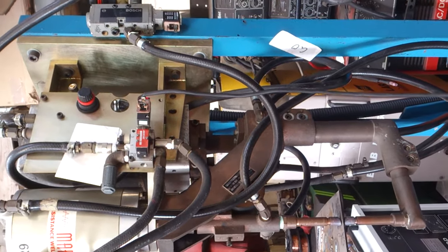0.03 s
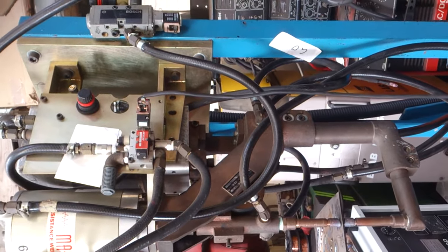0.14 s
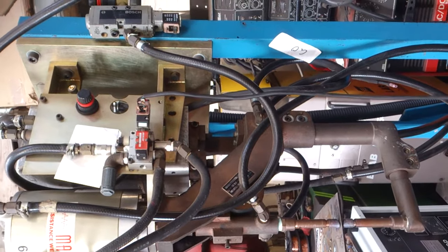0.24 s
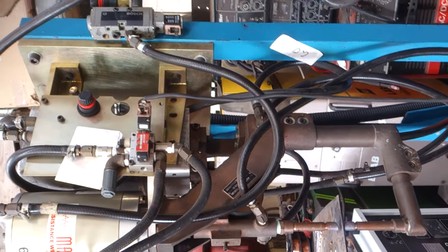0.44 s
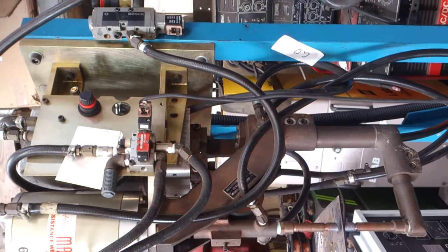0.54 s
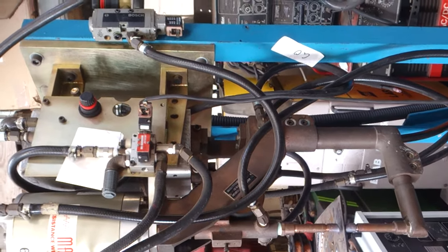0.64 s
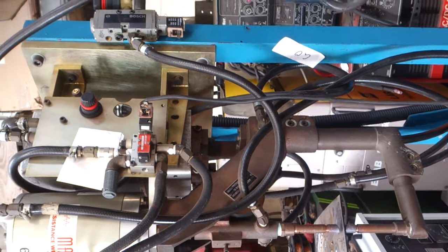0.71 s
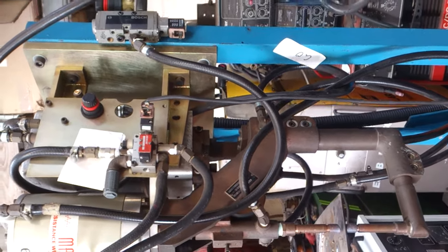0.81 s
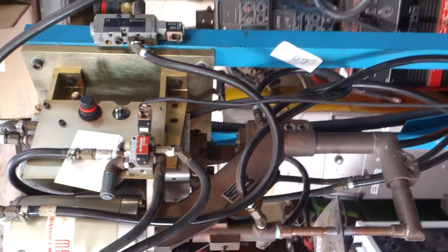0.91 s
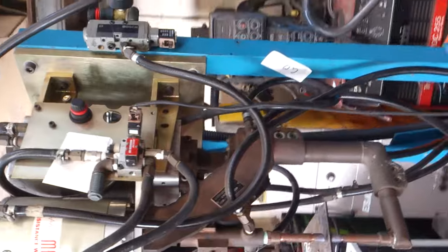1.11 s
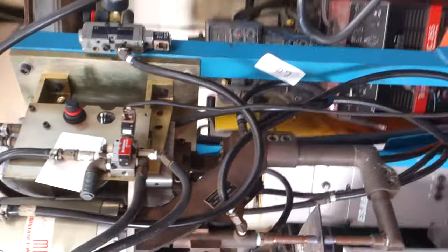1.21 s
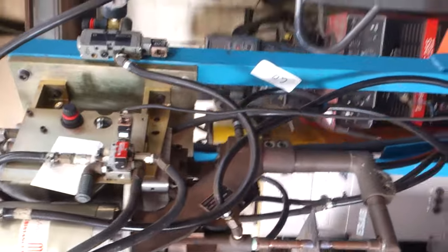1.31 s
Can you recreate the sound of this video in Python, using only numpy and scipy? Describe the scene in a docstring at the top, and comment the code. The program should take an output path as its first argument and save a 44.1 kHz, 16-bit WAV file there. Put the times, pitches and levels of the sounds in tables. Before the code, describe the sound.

A pneumatic spot welder clicks, vents a short burst of air with a falling whistle, then clacks hard on steel with a low knock; thin leak hiss continues, close microphone in a small workshop.

```python
"""Air-driven spot welder ending its cycle

A switch clicks and a valve ticks; the cylinder vents as shaped noise, a low puff and a whistle of falling pitch.
Steel hits its stop as noise cracks and ringing modes; then the arm knocks home and the frame booms, both as
sums of decaying modes. Faint creaks follow. A leak of resonant noise hisses over the workshop's low background.
"""
import sys
import numpy as np
from scipy import signal
from scipy.fft import rfft, irfft, next_fast_len
from scipy.io import wavfile
from scipy.ndimage import map_coordinates

SR = 44100
rng = np.random.default_rng(int(sys.argv[2]) if len(sys.argv) > 2 else 0)


def master(y):
    """Save y as 16-bit WAV."""
    cut = np.clip(np.atleast_2d(y).T, -1, 1)
    pcm = np.round(cut * 32767)  # scale
    wavfile.write(sys.argv[1], SR, pcm.astype(np.int16))


N = 59535
T = np.arange(N) / SR  # time of every sample, s
VENT_S, VENT_END_S, VENT_RISE_S = 0.1624, 0.444, 0.0022  # the exhaust port opens, closes; rise time


def amp(db):
    """Level: twenty decibels are a factor of ten in amplitude."""
    return 10 ** (np.asarray(db) / 20)


def unit(x):
    """Normalisation: the root-mean-square amplitude becomes 1."""
    return x / np.sqrt(np.mean(x ** 2) + 1e-20)


def along(points, hz):
    """Spectral interpolation: (frequency_hz, value) points are joined on a logarithmic axis."""
    f, v = np.transpose(points)
    return np.interp(np.log(hz + 1), np.log(f + 1), v)


def curve(rows):
    """Linear interpolation: (time_s, value) points are read at every sample."""
    return np.interp(T, *np.transpose(rows))


def wobble(rate):
    """Band-limited fluctuation: a spline through random knots, rate of them per second."""
    knots = rng.standard_normal(4096)
    return map_coordinates(knots, [T * rate], mode="wrap")


def filtered(x, response):
    """Linear filtering: the spectrum is multiplied by a function of frequency."""
    m = next_fast_len(N + 8192)
    spectrum = rfft(x, m) * response(np.fft.rfftfreq(m, 1 / SR))
    return irfft(spectrum, m)[:N]


def noise(response):
    """Coloured noise: white noise filtered, then brought to rms 1."""
    return unit(filtered(rng.standard_normal(N), response))


def rush(spectrum):
    """Turbulence noise: rms 1, coloured by (frequency_hz, level_db) points."""
    return noise(lambda hz: amp(along(spectrum, hz)))


def fade(start, rise, db_per_s):
    """Exponential decay: an exponential onset (time constant rise, s), then a steady fall in decibels."""
    age = np.maximum(T - start, 0)
    return (1 - np.exp(-age / rise)) * amp(-db_per_s * age)


def ring(modes, start, rise, waver):
    """Modal synthesis: damped sines are summed, each roughened by a wandering phase (waver, rad)."""
    total = 0
    for hz, db, t60 in modes:
        phase = 2 * np.pi * hz * (T - start) + waver * wobble(60)
        total = total + amp(db) * fade(start, rise, 60 / t60) * np.sin(phase)
    return total


def bursts(rows, rise):
    """Impact noise: short decaying bursts, each confined to its own band on an octave scale."""
    total = 0
    for start, db, hz, width, t60 in rows:
        band = noise(lambda f: 1 / (1 + (np.log2((f + 1) / hz) / width) ** 4))
        total = total + amp(db) * fade(start, rise, 60 / t60) * band
    return total


def in_room(x, wet_db):
    """Reverberation: convolution with a noise tail whose decay time depends on frequency."""
    # reverberation times of the workshop: frequency_hz, t60_s
    decay_times = [(150, 0.42), (1000, 0.63), (3000, 0.45), (7000, 0.63), (12000, 0.34)]
    # initial spectrum of the tail: frequency_hz, level_db
    tail_colour = [(150, 5.5), (400, 2), (1500, 3), (2800, 6.5), (4500, -3.5), (8000, -1), (12000, 1)]
    hz, t, z = signal.stft(rng.standard_normal(SR), SR, nperseg=256)
    tail_db = along(tail_colour, hz)[:, None] - 60 * t / along(decay_times, hz)[:, None]
    tail = signal.istft(z * amp(tail_db), SR, nperseg=256)[1]
    tail *= 1 - np.exp(-np.arange(len(tail)) / SR / 0.0017)  # soft onset
    tail /= np.linalg.norm(tail)
    return x + amp(wet_db) * signal.fftconvolve(x, tail)[:N]


def leak():
    """Jet noise: air escaping a narrow gap gives broadband hiss and resonant bands, fluttering together."""
    # hiss spectrum: frequency_hz, level_db
    hiss_spectrum = [(880, -60), (1500, -41), (2190, -23.5), (2740, -21.5), (3180, -19.5), (4370, -19.5),
                     (5280, -14), (6180, -8), (7030, -16), (7610, -13), (8400, -9.5), (10000, 0),
                     (12200, -13.5), (13800, -17), (16000, -47)]
    # resonances of the gap: centre_hz, width_hz, level_db
    resonances = [(5202, 103, -9), (5600, 640, -11.5), (7763, 290, -5.5), (9810, 420, 0.5), (10240, 400, 0)]
    # strength of the leak: time_s, level_db
    strength = [(0, -38.5), (.3, -37.5), (.62, -39), (.9, -39.5), (1.35, -39)]
    peaks = 0
    for hz, width, db in resonances:
        peaks = peaks + amp(db) * noise(lambda f: 1 / (1 + (2 * (f - hz) / width) ** 2))
    air = amp(-2) * rush(hiss_spectrum) + amp(-4) * unit(peaks)
    return amp(curve(strength) + 0.24 * wobble(350)) * air


def background():
    """Stationary noise: the workshop's low, steady background."""
    # background spectrum: frequency_hz, level_db
    shop_spectrum = [(25, -27), (33, -3), (43, 3), (70, -5.5), (110, -2), (200, -3.5), (350, -7.5),
                     (500, -9.5), (1000, -11), (2000, -17.5), (4000, -46)]
    return amp(-57.5) * rush(shop_spectrum)


def ticks():
    """Contact noise: small dry contacts of the switch and valve excite short bands of noise."""
    # contacts: start_s, level_db, centre_hz, half_width_octaves, t60_s
    contacts = [(0.0307, -31, 5730, 0.23, 0.027), (0.0348, -30, 3400, 0.35, 0.032),
                (.036, -36.5, 900, 1.4, 0.051), (.1235, -36, 6760, .2, 0.091),
                (0.1238, -43, 2550, 0.23, 0.088), (.127, -46, 3590, 0.029, 0.39),
                (0.1461, -37, 3600, 0.035, 0.041), (0.1455, -32, 5940, 0.51, 0.027)]
    return bursts(contacts, rise=0.00027)


def exhaust_noise():
    """Turbulent outflow: hiss and body sink at their own rates as the cylinder pressure drains."""
    # bright hiss: frequency_hz, level_db
    hiss_spectrum = [(1760, -50), (3000, -22), (3770, -18.5), (4970, -7), (6170, -8.5), (7910, 3),
                     (10300, -10.5), (11200, -25), (13300, -25), (14400, -43), (15000, -63)]
    # lower body: frequency_hz, level_db
    body_spectrum = [(88, -29), (150, -21), (398, -6.5), (432, -3), (748, -6.5), (1100, 2), (1310, -3.5),
                     (1470, -0.5), (2250, -4), (2610, -7.5), (4000, -10), (5200, -20), (8800, -120)]
    hiss = amp(-22.5) * fade(VENT_S, VENT_RISE_S, db_per_s=74) * rush(hiss_spectrum)
    body = amp(-35.5) * fade(VENT_S, rise=0.0023, db_per_s=39.5) * rush(body_spectrum)
    return hiss + body


def whistle():
    """Flow tone: a jittering sine at the exhaust port falls in pitch as the pressure drains."""
    # path of the tone: time_s, pitch_hz, level_db
    tone_path = [(0.165, 8920, -24), (.170, 9094, -19.5), (.173, 8400, -23), (0.19, 8200, -26),
                 (.212, 7680, -27.5), (.236, 7030, -28), (0.251, 6750, -28.5), (0.266, 6490, -30),
                 (0.285, 5980, -34), (.31, 5400, -39.5), (0.331, 5050, -67)]
    s, hz, db = np.transpose(tone_path)
    pitch = np.interp(T, s, hz) * (1 + 0.01046 * wobble(900))
    level = amp(np.interp(T, s, db) + 0.5 * wobble(300))
    opening = np.clip((T - VENT_S) / VENT_RISE_S, 0, 1)
    phase = 2 * np.pi * np.cumsum(pitch) / SR
    return opening * level * np.sqrt(2) * np.sin(phase)  # sqrt(2) gives the sine rms 1


def puff():
    """Pressure pulse: the opening valve pushes the air in one low, strongly damped oscillation."""
    start_s, pitch_hz, t60_s = 0.1625, 248, 0.0081
    push = np.sin(2 * np.pi * pitch_hz * (T - start_s))
    return -amp(-17.5) * fade(start_s, 0.00038, 60 / t60_s) * push


def clack():
    """Impact excitation: steel rattles on the stop, each contact cracks and the stop's modes ring."""
    # contacts at the stop: start_s, level_db, t60_s
    contacts = [(0.3151, -17.5, 0.023), (0.3161, -6, 0.01), (0.318, -14, 0.078), (0.3221, -19.5, 0.052)]
    # spectrum of each crack: frequency_hz, level_db
    crack_spectrum = [(600, -54), (1100, -29), (1700, -26), (2900, -18.5), (3600, -15.5), (4700, -9.5),
                      (5700, -12.5), (6500, -11.5), (8000, -8.5), (10200, -8), (11200, -23), (12200, -21.5),
                      (14000, -43), (16000, -57)]
    # modes of the steel stop: pitch_hz, level_db, t60_s
    stop_modes = [(3540, -9, 0.12), (3690, -5.5, .26), (4248, -6.5, 0.26), (4685, 5.5, 0.11),
                  (4889, 6, 0.12), (5310, 1, 0.11), (6080, -10, 0.29), (6920, -5, 0.097), (7240, -4, 0.057),
                  (7660, 5, 0.091), (7880, -2, 0.072), (8840, -9, 0.061), (9680, -2.5, 0.1),
                  (10094, -10, 0.13)]
    cracks = 0
    for start, db, t60 in contacts:
        cracks = cracks + amp(db) * fade(start, 0.00028, 60 / t60) * rush(crack_spectrum)
    return cracks + amp(-25.5) * ring(stop_modes, start=0.3155, rise=0.0016, waver=0.37)


def arm_knock():
    """Damped vibration: the heavy arm knocks home and its modes die quickly."""
    # modes of the arm: pitch_hz, level_db, t60_s
    arm_modes = [(624, 3.5, 0.024), (730, -4, 0.036), (928, 3.5, 0.031), (1070, -3.5, 0.043),
                 (1511, -4.5, .035)]
    return amp(-16.5) * ring(arm_modes, start=0.3395, rise=0.0017, waver=0)


def frame_boom():
    """Structural resonance: the knock sets the frame's low modes swelling and slowly decaying."""
    # modes of the frame: pitch_hz, level_db, t60_s
    frame_modes = [(165.2, -21.5, 0.13), (216.2, -4, 0.14), (217.6, -18.5, .46), (298.2, -14.5, 0.23),
                   (374, -21.5, 0.2), (601.4, -17, 0.17), (654, -16, 0.14), (727, -19, 0.17),
                   (861, -29, 0.27), (1168, -24.5, 0.22), (1542, -21, 0.12)]
    return amp(-12) * ring(frame_modes, start=0.3455, rise=0.0092, waver=0.64)


def creaks():
    """Frictional noise: faint creaks in mostly narrow bands as the machine settles."""
    # creaks: start_s, level_db, centre_hz, half_width_octaves, t60_s
    settling = [(.635, -52.5, 3270, 0.038, 0.24), (.698, -47.5, 1090, 0.064, 0.11),
                (.718, -48, 3200, 0.12, 0.14), (.79, -53, 3320, 0.07, 0.13)]
    return bursts(settling, rise=0.009)


def scene():
    """Superposition: the reverberant machine sounds add to the unreverberated leak and background."""
    steady = leak() + background()
    contacts = in_room(ticks() + creaks(), wet_db=-6.5)
    closing = amp(-200 * np.maximum(T - VENT_END_S, 0))  # an extra fall of 200 dB per s
    exhaust = (exhaust_noise() + whistle()) * closing
    vent = in_room(exhaust + puff(), wet_db=-8.5)
    stop = in_room(clack(), wet_db=-5)
    arm = in_room(arm_knock() + frame_boom(), wet_db=-12)
    return (steady + contacts + vent + stop + arm)[None]


def record(dry):
    """Band limitation: a steep high-pass at 46 Hz and a sharp cut-off at 16200 Hz."""
    high_pass = signal.butter(6, 46, "highpass", fs=SR, output="sos")
    bass_cut = signal.sosfilt(high_pass, dry[0])
    return filtered(bass_cut, lambda hz: hz < 16200)[None]


dry = scene()
out = record(dry)
master(out)
```